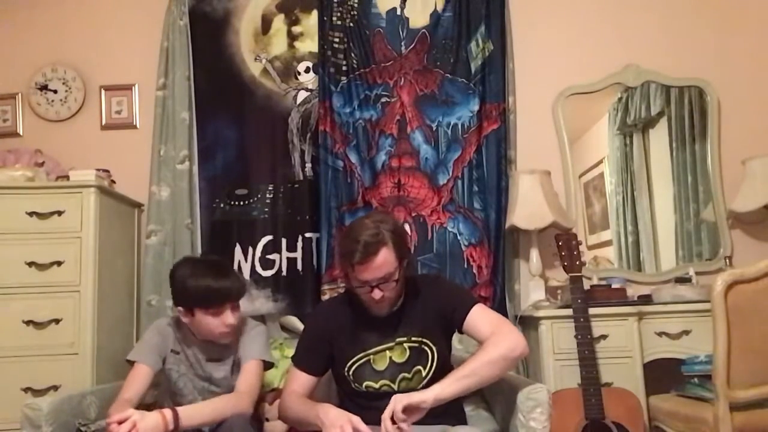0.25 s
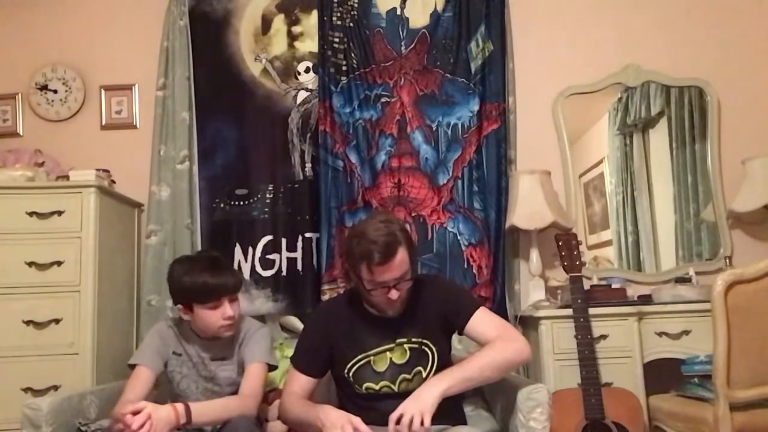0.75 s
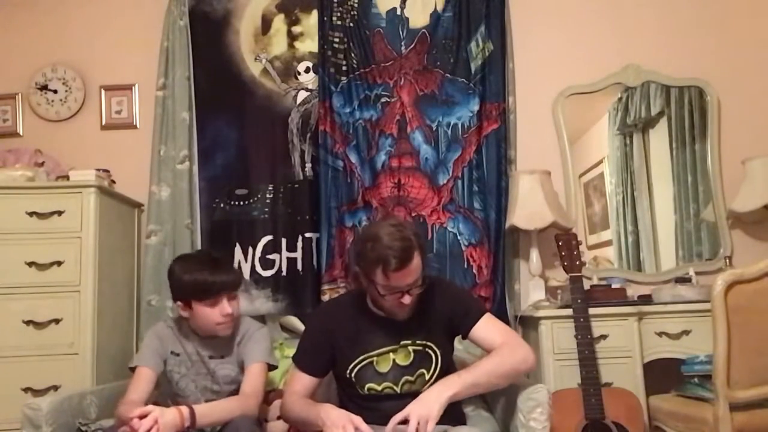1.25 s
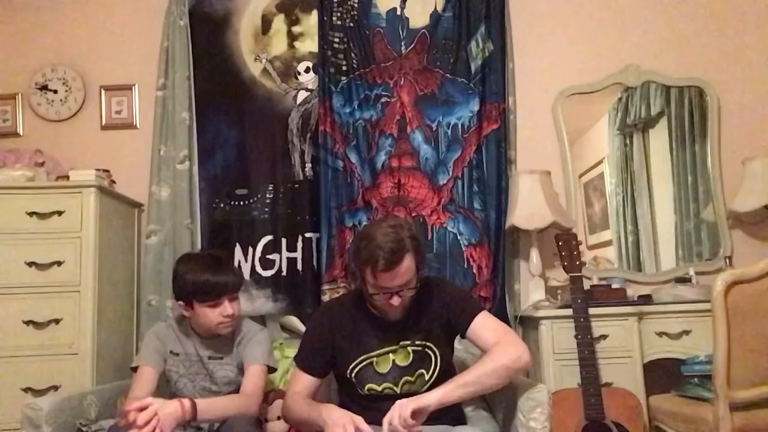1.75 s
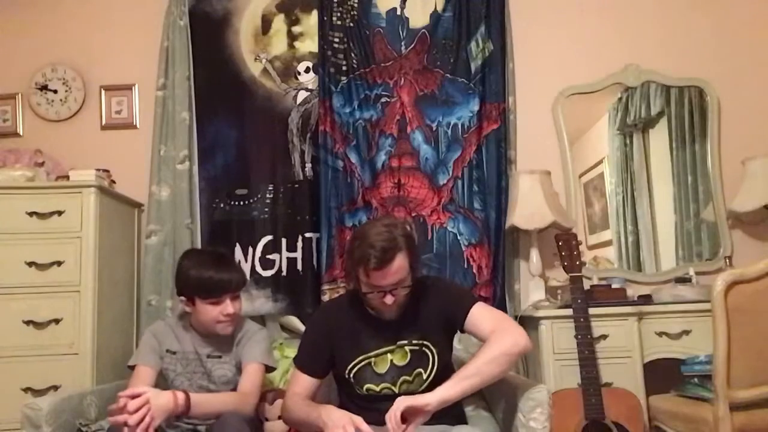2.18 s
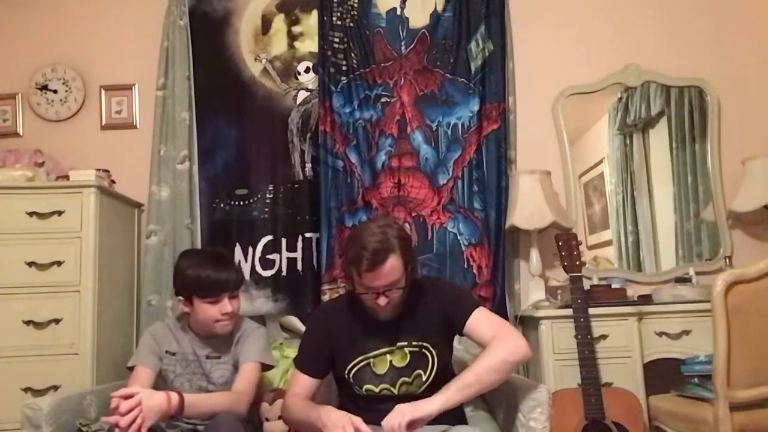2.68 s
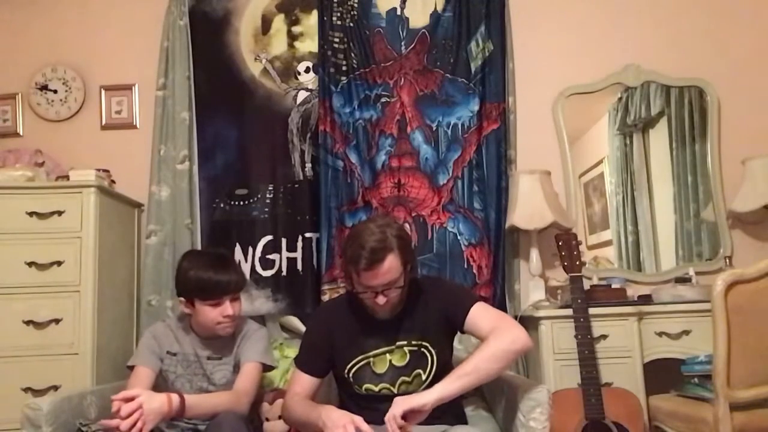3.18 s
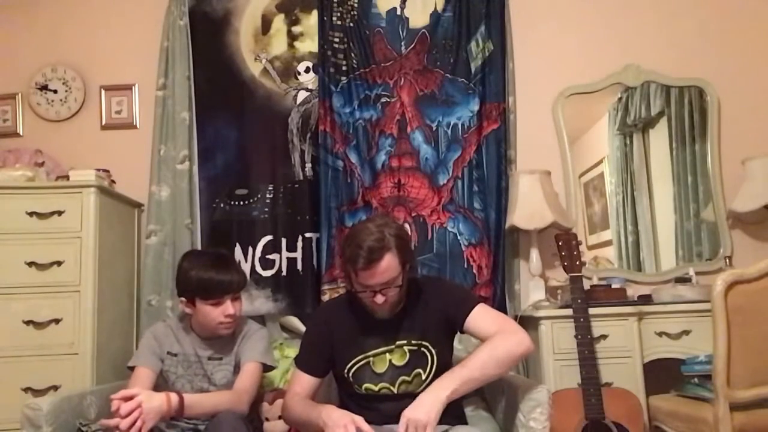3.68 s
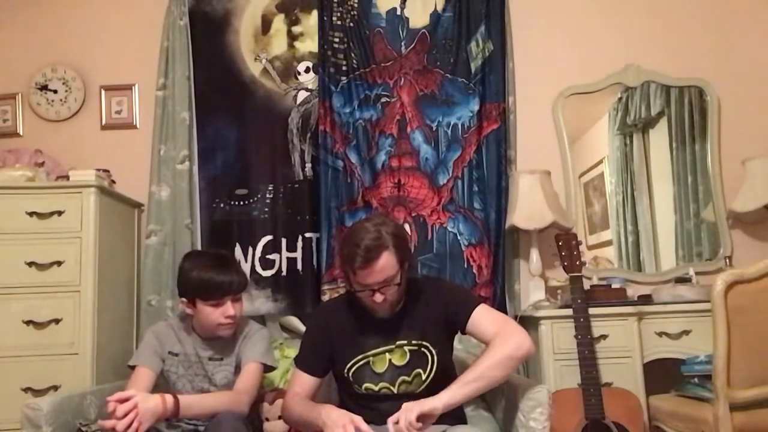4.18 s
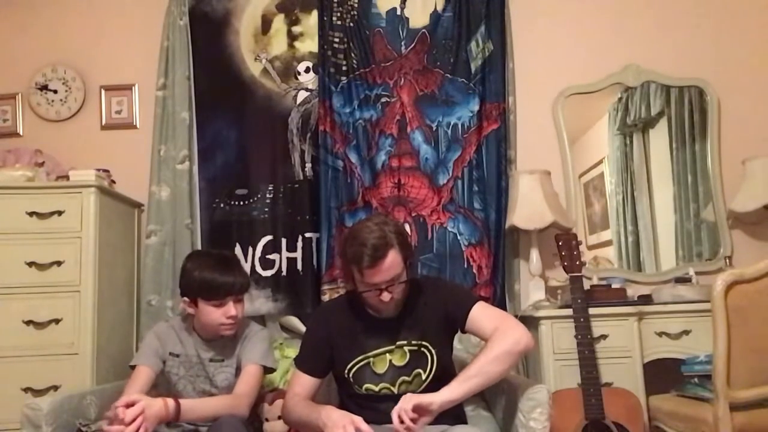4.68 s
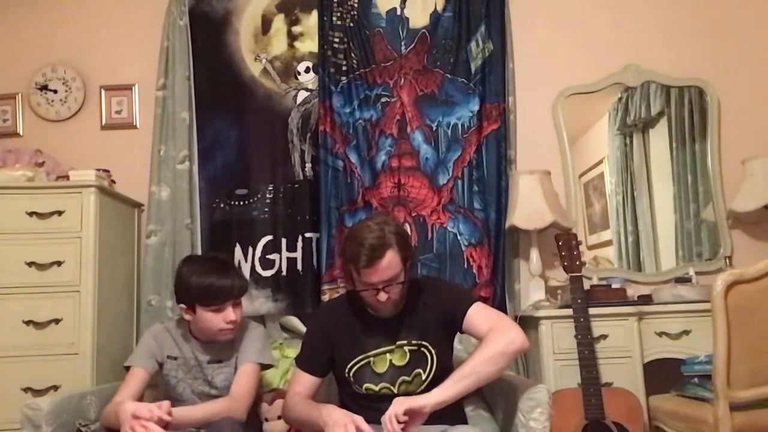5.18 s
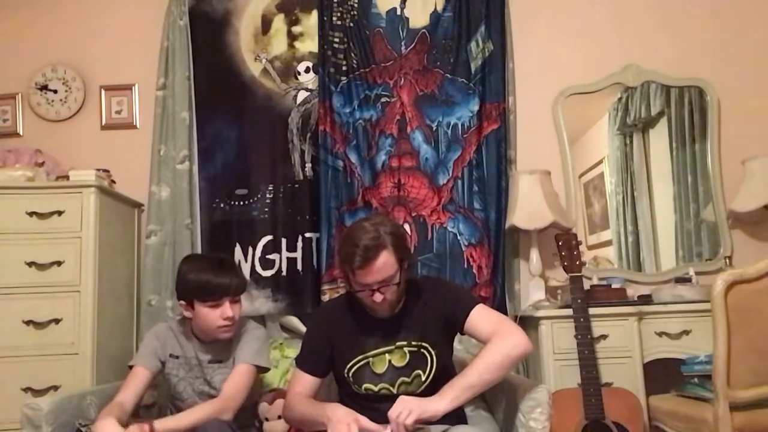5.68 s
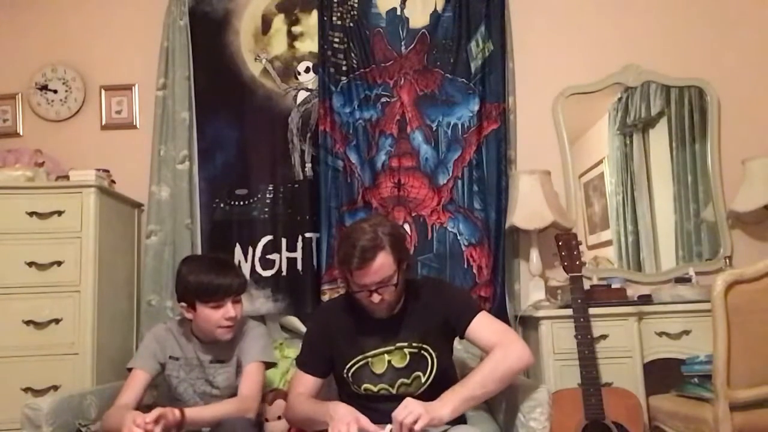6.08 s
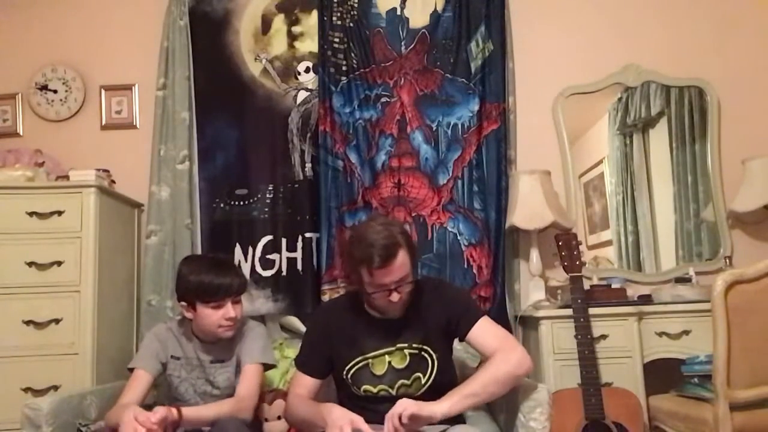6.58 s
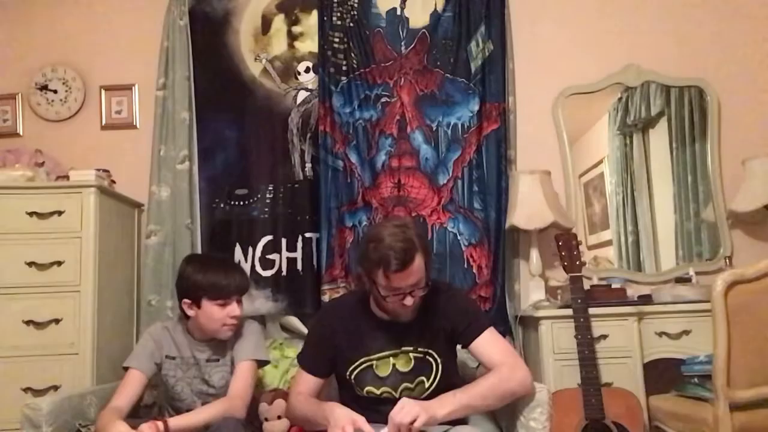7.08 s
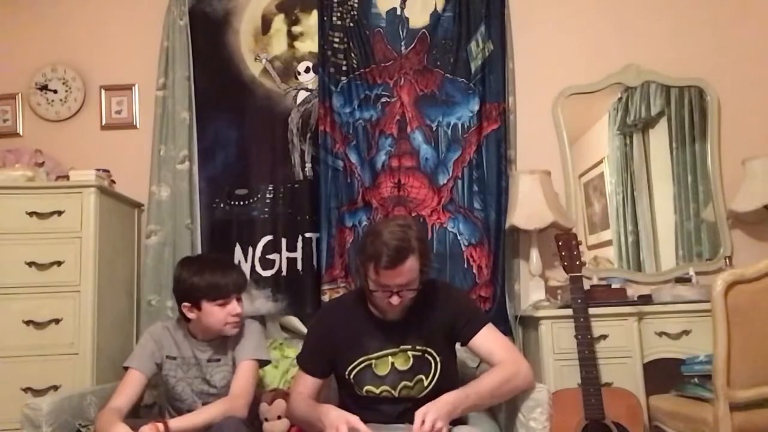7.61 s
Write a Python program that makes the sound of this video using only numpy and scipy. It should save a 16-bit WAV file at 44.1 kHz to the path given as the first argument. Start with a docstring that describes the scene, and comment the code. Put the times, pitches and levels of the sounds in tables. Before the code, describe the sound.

Hands unwrap a stiff plastic package in a small room, sparse faint crackles building to loud sharp snaps and a dense crinkling burst.

```python
"""Sharp plastic snaps crackle one by one above a faint rustle, as hands unwrap a stiff package.
The microphone is a couple of metres away in a small furnished room. Each snap is a filtered click
with a noisy chatter; the rustle is a random train of filtered grains. Single echoes throw the snaps
back from floor and walls, and a dense noise-like tail follows both the snaps and the rustle.
Underneath lie a few wavering low tones and a steady shaped-noise hiss."""
import sys
import numpy as np
from scipy import signal
from scipy.fft import rfft, irfft
from scipy.io import wavfile
from scipy.ndimage import uniform_filter1d

SR = 44100
rng = np.random.default_rng(int(sys.argv[2]) if len(sys.argv) > 2 else 0)


def inscribe(sig):
    """Save sig as 16-bit PCM at rate SR to the path in sys.argv[1].

    A 1-D sig is mono; a 2-D sig holds one channel per row.
    Samples are clipped to [-1, 1] before scaling.
    """
    pcm = np.round(np.clip(np.atleast_2d(sig).T, -1, 1) * 32767)
    wavfile.write(sys.argv[1], SR, pcm.astype(np.int16))


N = 346185  # length in samples

HIGH_RING_DB = -12.5  # on the same scale as the ring, thump and sparkle levels below
CHATTER_T60_S, CHATTER_SCATTER = .015, 0.2  # typical decay, and its chance spread (natural log)
ECHO_CHATTER_T60_S = .008  # extra decay that shortens the chatter in echoes
FLIGHT_S = .0008  # lag from crease to peak
# where the colour of a click takes a chance bump or dip: f/Hz
RIPPLE_HZ = np.linspace(900, 15000, 24)
# creases snapping: t/s, peak level/dB, high ring f/Hz, low ring level/dB, thump level/dB,
# sparkle level/dB, low ring f/Hz, level sent into the room rather than at the microphone/dB
SNAPS = [(0.0242, -41, 5980, -7, -9, -27, 3630, -1), (0.1313, -39, 6400, -12, -22, -37, 3860, -2.5),
         (0.182, -41, 6500, -13, -28, -18, 3100, 0.5), (0.2114, -32.5, 6300, -16, -28, -23, 3750, -1),
         (0.2894, -39.5, 6390, -6, -20, -20, 1520, -2.5), (0.4618, -46.5, 5330, -3.5, -9, -35, 3150, -2),
         (1.1794, -47, 5560, -8, -8, -24, 1720, -6), (1.3325, -47.5, 4530, -2, -20, -24, 1770, -2.5),
         (1.3508, -33.5, 4500, -11.5, -16, -30, 3790, -2.5), (1.4003, -40, 5220, -18, -18, -25, 2990, -1.5),
         (1.4948, -42, 5410, -4, -18, -24, 1730, 0), (1.5202, -33.5, 5050, -8.5, -17.5, -20.5, 1920, -2),
         (1.6691, -43.5, 4660, -12, -25, -30, 3770, -1), (1.714, -43.5, 5070, -9, -10.5, -24, 2730, 0),
         (1.785, -29, 5980, -15, -27, -21, 3960, -2), (1.9114, -37.5, 6300, -2, -14, -19, 1540, -3),
         (1.926, -29, 7460, -27, -24, -17, 3090, -1.5), (2.2506, -21.5, 7050, -21, -38, -16.5, 3030, -1.5),
         (2.2901, -18, 7200, -21, -35.5, -17.5, 3780, -2.5),
         (2.3115, -15.5, 6550, -23.5, -36, -22, 4210, -2), (2.3936, -31.5, 5630, -13, -24, -14, 4340, -8),
         (2.4129, -15.5, 6800, -16, -34.5, -24, 4000, -1.5), (2.7087, -45, 5400, -8, -19, -23, 2820, 1),
         (2.7294, -45.5, 5040, -8, -19, -27, 3150, 0), (2.7913, -36, 4900, -7, -20.5, -20, 3020, -0.5),
         (2.9257, -48, 6570, -23, -24, -21, 3260, -2), (3.0066, -32.5, 6700, -26, -31, -10, 2880, -1),
         (3.2288, -54.5, 5440, -1, 0, -26, 1500, -9), (3.4795, -50, 5380, -18, -19, -20, 4440, -4),
         (3.6015, -39, 5830, -7.5, -27, -36, 3280, -3.5), (3.7519, -43.5, 4730, -9, -25, -22, 2830, 0),
         (3.7845, -30.5, 7180, -17, -29, -17.5, 4080, -3), (3.8034, -32.5, 6980, -20, -31, -21, 4300, -2),
         (3.8891, -28.5, 4750, -17, -40, -22.5, 3400, -3),
         (4.0964, -47.5, 4760, -1.5, -13.5, -29, 2360, -1.5), (4.127, -46.5, 5730, -9, -9, -24, 1800, -3.5),
         (4.1947, -46.5, 6840, -8, -18, -28, 3480, -6), (4.2167, -41, 6700, -11, -28, -20, 2150, -2),
         (4.2287, -38, 6190, -11, -25, -22, 2930, -0.5), (4.273, -24.5, 4860, -9.5, -18, -17, 2890, -1),
         (4.2831, -20, 4820, -10, -29, -31.5, 3400, -2), (4.3264, -36, 5110, -3, -18, -26, 3950, -1.5),
         (4.3555, -33.5, 7700, -9, -26, -18, 4060, -2), (4.4593, -30.5, 6680, -10, -33, -25, 3770, -4),
         (4.4806, -37.5, 6750, -16, -24, -20, 4020, -0.5), (4.537, -13, 8780, -17, -33.5, -18.5, 3680, -2),
         (4.622, -31, 5670, -5.5, -32, -37, 1960, -2), (4.6645, -36, 5200, -0.5, -7, -26, 1620, -1.5),
         (4.8201, -24, 6480, -17, -19, -15, 2950, -2), (4.8724, -28, 7240, -10.5, -12.5, -24, 3010, -1),
         (5.0818, -28.5, 7100, -21, -29, -24.5, 2730, -0.5), (5.1047, -26.5, 6800, -11, -36, -23, 3020, -2),
         (5.125, -23.5, 6260, -13, -37, -15.5, 3740, -1.5), (5.2551, -26, 5960, -14, -33, -19, 2870, 0),
         (5.3259, -15.5, 5540, -17.5, -38, -28, 3610, -1), (5.451, -8, 6450, -11.5, -27, -24.5, 3840, -1),
         (5.5051, -7, 5670, -9.5, -30.5, -25, 3870, -1), (5.6054, -2.5, 7800, -7.5, -33, -26.5, 2880, -2),
         (5.7534, -2.5, 6150, -11, -34, -27, 3720, -1.5),
         (5.9461, -2.5, 5840, -12.5, -31, -29.5, 3800, -1.5),
         (6.1756, -50.5, 7100, -1, -5.5, -20, 3610, -2), (6.2054, -41, 5400, -13, -24, -16, 2900, -1),
         (6.2342, -41, 7120, -14, -23, -18, 2930, -1), (6.2592, -34.5, 6500, -10.5, -28, -26, 2800, -1.5),
         (6.348, -37, 5000, -13, -26, -39, 3950, -4), (6.3674, -38.5, 4510, -11.5, -21.5, -31, 3730, -1),
         (6.41, -27.5, 8620, -18.5, -27, -17, 3380, -4), (6.5049, -29.5, 5800, -8.5, -15.5, -23, 3020, 0.5),
         (6.554, -30.5, 6400, -17.5, -19.5, -16, 3960, -0.5),
         (6.7246, -29.5, 7540, -8.5, -26, -5, 3050, -1.5),
         (6.7446, -14, 7000, -20.5, -33.5, -30.5, 3000, -2.5),
         (6.9557, -6.5, 5900, -18, -38.5, -26.5, 3500, -1),
         (6.99, -7.5, 6200, -12, -35.5, -26.5, 3350, -0.5), (7.0033, -4.5, 6400, -11, -26, -30.5, 3970, -2),
         (7.0124, -8.5, 4700, -14, -32.5, -28, 4500, 2), (7.1252, -6.5, 5440, -9, -27, -26, 3900, 1),
         (7.1394, -9, 4940, -15, -24, -21, 3470, -1.5), (7.19, -21, 5710, -5.5, -15.5, -22, 3660, -0.5),
         (7.2625, -31.5, 5710, -16, -14.5, -16.5, 4370, -1), (7.3476, -26, 5940, -13, -25, -19.5, 3500, 1),
         (7.5525, -50, 4530, -5, -9, -8, 2790, -5), (7.5656, -36.5, 5400, -7.5, -15, -22, 2880, -1),
         (7.6907, -50.5, 5610, -0.5, -10.5, -31.5, 3460, -1)]
# strong single reflections, how late each arrives: t/s
ECHO_S = [.0057, .0108, .0126, .014, .0185, .02, .0212, .0262, .0345]
# the same reflections, how loud: level/dB
ECHO_DB = [1.5, -3.5, -7.5, -18.5, -3.5, -8, -15.5, -23.5, -8]


def snaps():
    """A buckling crease clicks with two rings, then the sheet chatters; echoes reshuffle the chatter."""
    direct, spread, echoes = np.zeros((3, N))
    t = np.arange(400) / SR
    chance = rng.standard_normal((len(SNAPS), len(ECHO_S) + 1, len(t) + 2))
    ripples = rng.standard_normal((len(SNAPS), len(RIPPLE_HZ)))
    for snap, rows, ripple in zip(SNAPS, chance, ripples):
        s, db, high_hz, low_db, thump_db, sparkle_db, low_hz, room_db = snap
        start = s + FLIGHT_S
        click = snap_click(db, high_hz, low_db, thump_db, sparkle_db, low_hz, ripple)

        # row 0 is the direct sound, the others are its echoes
        t60 = CHATTER_T60_S * np.exp(CHATTER_SCATTER * rows[0, 0])
        chatter_level = (1 - np.exp(-t / 0.00062)) * gain_of(-60 * t / max(t60, .001))
        shakes = rows[:, 2:] * chatter_level
        shakes[0] *= .22
        shakes[1:] *= .3 * gain_of(-60 * t / ECHO_CHATTER_T60_S)
        shakes[:, 0] = -1  # the click itself
        shakes[1:, 0] *= .7  # furniture blunts the edge of an echo

        add(direct, start, np.convolve(shakes[0], click))
        add(spread, start, gain_of(room_db) * click)
        for delay, echo_db, row, shake in zip(ECHO_S, ECHO_DB, rows[1:], shakes[1:]):
            # each snap happens at another spot, so its echoes shift in time and level
            arrival = start + delay + .0002 * row[0]
            size = gain_of(room_db + echo_db + 2.7 * row[1])
            add(echoes, arrival, size * np.convolve(shake, click))
    return direct, spread, echoes


def snap_click(db, high_hz, low_db, thump_db, sparkle_db, low_hz, ripple):
    """The bare click: thump, two rings and sparkle form its spectrum, made uneven by chance ripples."""
    high_db = HIGH_RING_DB
    valley_db = (low_db + high_db) / 2 - 7
    colour = [(60, thump_db - 36.5), (250, thump_db - 1.5), (800, thump_db + 7),
              (0.68 * low_hz, low_db - 2.5), (low_hz, low_db),
              (np.sqrt(low_hz * high_hz), valley_db),
              (0.65 * high_hz, high_db + 1.0), (high_hz, high_db),
              (1.157 * high_hz, high_db - 3), (1.2 * high_hz, high_db - 3.5),
              (13000, sparkle_db), (16000, sparkle_db - 13)]
    click = causal(sorted(colour))
    ripple_db = 2 * ripple * (RIPPLE_HZ > 1000)
    uneven = causal(np.transpose([RIPPLE_HZ, ripple_db]))
    click = np.convolve(click, uneven[:200])
    without_thump = click - uniform_filter1d(click, size=15)  # the peak leaves the thump aside
    return click * (gain_of(db) / abs(without_thump).max())


GRAINS_PER_S = 250
BRIGHT_DB, QUIET_DB = -5, -67  # treble gain of a rustle at the level QUIET_DB
DULLING = .2  # dB of treble lost per dB of level above QUIET_DB
# fingers working the film, late reflections counted in: t/s, level/dB
RUSTLE = [(0, -62.5), (.5, -70.5), (1.2, -71), (1.4, -62), (2, -66.5), (2.53, -66.5), (3.3, -71.5),
          (3.6, -68), (4.2, -70), (4.5, -65), (4.61, -53), (4.72, -62), (5.2, -62.5), (5.75, -47.5),
          (6.05, -59.5), (6.45, -59.5), (6.82, -74.5), (7.04, -46.5), (7.13, -39), (7.2, -44), (7.37, -68),
          (7.85, -65)]
# relative colour of the small crackles: f/Hz, level/dB (per Hz)
FILM = [(120, -48.5), (200, -9.5), (353, -12.5), (482, -23), (1400, -13.5), (2800, -1), (5330, -4.5),
        (9230, -2.5), (16000, -27.5)]


def rustle():
    """Tiny creases crackle at random, a few larger than the rest; harder handling sounds duller."""
    s, level_db = np.transpose(RUSTLE)
    bright_db = BRIGHT_DB - DULLING * (level_db - QUIET_DB)
    t = np.arange(N) / SR
    size_db = 4.5 * np.minimum(rng.exponential(1, N), 4)
    size = gain_of(size_db) * rng.choice([-1., 1.], N)
    impulses = size * (rng.random(N) < GRAINS_PER_S / SR)
    grains = evened(signal.oaconvolve(impulses, causal(FILM))[:N])
    dull = signal.lfilter(*signal.butter(2, 4000, fs=SR), grains)
    treble = grains - dull
    grains = dull + gain_of(np.interp(t, s, bright_db)) * treble
    level = gain_of(np.interp(t, s, level_db))
    return level * grains / np.sqrt(1 + gain_of(2 * TAIL_DB))  # leave space for the tail's energy


TAIL_DB = 6  # energy of the late reflections over the sound sent into the room, before the walls
# how long the room rings: f/Hz, t60/s
ROOM = [(300, 0.25), (800, 0.19), (1500, 0.27), (2500, 0.21), (4000, 0.23), (6500, 0.25), (9000, 0.23),
        (12000, 0.22), (16000, 0.21)]


def tail(x, count=3):
    """Dense late reflections; several tails share the time so that like snaps do not ring alike."""
    out, t = np.zeros(N), np.arange(N) / SR
    for k in range(count):
        # one reflection at a random place in every 10 samples
        taps = np.zeros(SR // 2)
        at = np.arange(120, SR // 2 - 10, 10)
        places = at + rng.integers(0, 10, len(at))
        signs = rng.choice([-1., 1.], len(at))
        taps[places] = signs * gain_of(3.0 * rng.standard_normal(len(at)))

        # each frequency band dies away at its own pace
        hz, lag, z = signal.stft(taps, SR, nperseg=128)
        swell = 1 - np.exp(-lag / 0.0068)  # reflections thicken at first
        decay = gain_of(-60 * lag / read(ROOM, hz)[:, None])
        ring = signal.istft(z * swell * decay, SR, nperseg=128)[1]

        # the shares rise and fall in turn while their summed power stays constant
        share = np.sqrt(2 / count) * np.cos(np.pi * (3.1 * t + k / count))
        out += signal.oaconvolve(x * share, ring / np.linalg.norm(ring))[:N]
    return out


# what reflections keep: f/Hz, level/dB
WALLS = [(300, -1.5), (1200, -7.5), (2500, -2), (5000, 5), (8500, 1), (11000, -6), (16000, -9)]


def off_walls(x):
    """Floor and walls colour everything they reflect, as one filter."""
    return signal.oaconvolve(x, causal(WALLS))[:N]


# pitches of the low tones: f/Hz
HUM_HZ = [59.5, 90.4, 119.7, 461.]
# one row per tone: depth of wavering (0-1), level/dB, rate of wavering f/Hz
HUM = [(.3, -78, 1.5), (.17, -62.5, 4), (.35, -67.5, 5), (.3, -78, 3)]


def hum():
    """Low tones, each a sine whose pitch and level waver with slow complex noise."""
    t, out = np.arange(N) / SR, np.zeros(N)
    for hz, (depth, db, rate_hz) in zip(HUM_HZ, HUM):
        r = np.exp(-np.pi * rate_hz / SR)
        noise = rng.standard_normal(N) + 1j * rng.standard_normal(N)
        wander = signal.lfilter([1], [1, -r], noise)
        wander /= np.sqrt(np.mean(abs(wander) ** 2))
        tone = ((1 + depth * wander) * np.exp(2j * np.pi * hz * t)).real
        out += gain_of(db) * evened(tone)
    return out


HISS_DB = -65  # overall RMS level
# relative colour of the hiss: f/Hz, level/dB (per Hz)
HISS = [(15, -63.5), (25, -41.5), (59, -30), (75, -15), (91, -7), (129, -14.5), (148, -12), (234, -10.5),
        (324, -16.5), (635, -21.5), (746, -21), (1550, -23.5), (1920, -24.5), (3560, -32.5), (15700, -38)]


def hiss():
    """Steady noise of room air and microphone: white noise shaped in frequency."""
    spectrum = rfft(rng.standard_normal(N))
    spectrum *= gain_of(read(HISS, np.fft.rfftfreq(N, 1 / SR)))
    return gain_of(HISS_DB) * evened(irfft(spectrum, N))


def gain_of(db):
    """Amplitude factor of a level in dB."""
    return 10 ** (np.asarray(db) / 20)


def evened(x):
    """The sound brought to an RMS of one."""
    return x / np.sqrt(np.mean(x ** 2) + 1e-20)


def read(points, hz):
    """Value of a frequency table at hz, interpolated along log frequency."""
    f, value = np.transpose(points)
    return np.interp(np.log(hz + 1), np.log(f + 1), value)


def add(mix, s, sound):
    """Lay a sound into the mix at s seconds, cut off at the end."""
    part = mix[round(s * SR):][:len(sound)]
    part += sound[:len(part)]


def causal(points):
    """Shortest causal response with the given spectrum, by folding the cepstrum."""
    level_db = read(points, np.fft.rfftfreq(2048, 1 / SR))
    cepstrum = irfft(np.log(gain_of(level_db)))
    cepstrum[1:1024] *= 2
    cepstrum[1025:] = 0
    return irfft(np.exp(rfft(cepstrum)))[:1024]


def scene():
    """Snaps and rustle, their reflections, then hum and hiss, in one channel."""
    direct, spread, echoes = snaps()
    grains = rustle()
    late = gain_of(TAIL_DB) * tail(spread + grains)
    reflected = off_walls(echoes + late)
    return (direct + grains + reflected + hum() + hiss())[None]


EDGE_HZ = 16600  # upper band limit


def record(dry):
    """The microphone cuts the deep bass; then a steep low-pass limits the band."""
    bass_cut = signal.butter(2, 40, "high", fs=SR, output="sos")
    thinned = signal.sosfilt(bass_cut, dry)
    band_limit = signal.firwin(255, EDGE_HZ, window=("kaiser", 9), fs=SR)
    return signal.oaconvolve(thinned, band_limit[None], "same")


dry = scene()
out = record(dry)
inscribe(out)
```